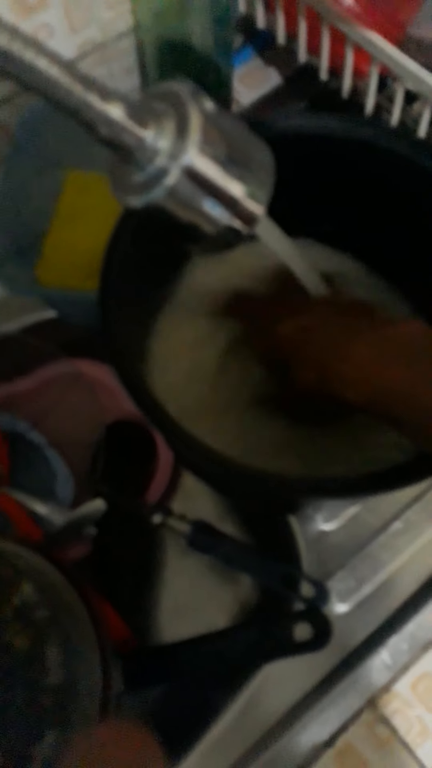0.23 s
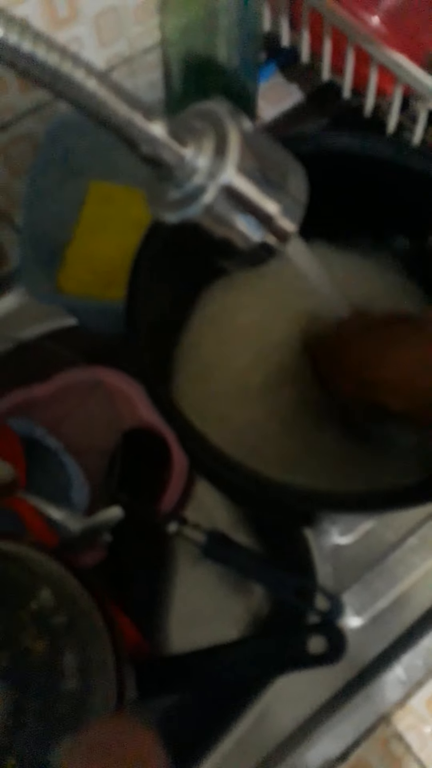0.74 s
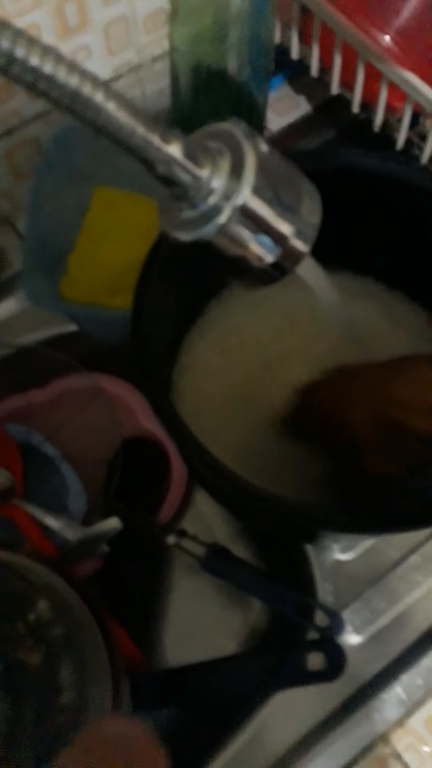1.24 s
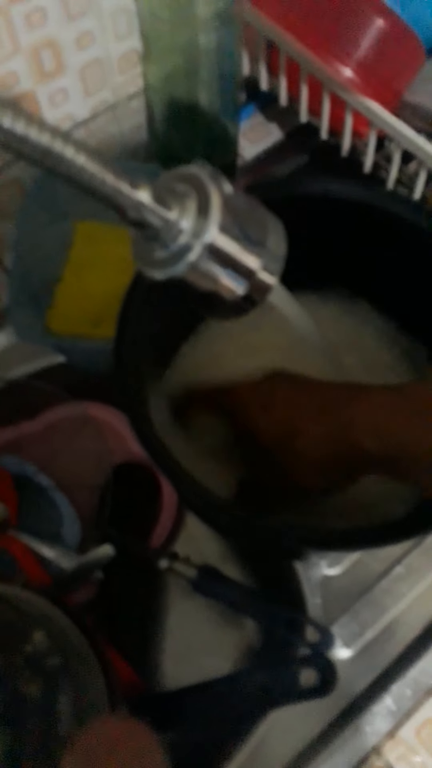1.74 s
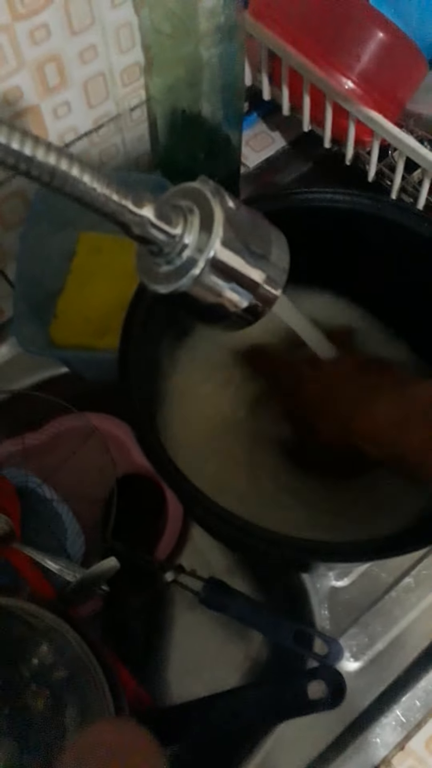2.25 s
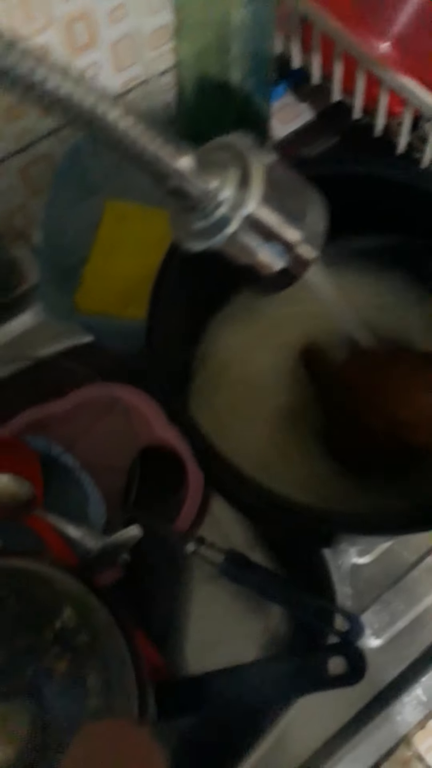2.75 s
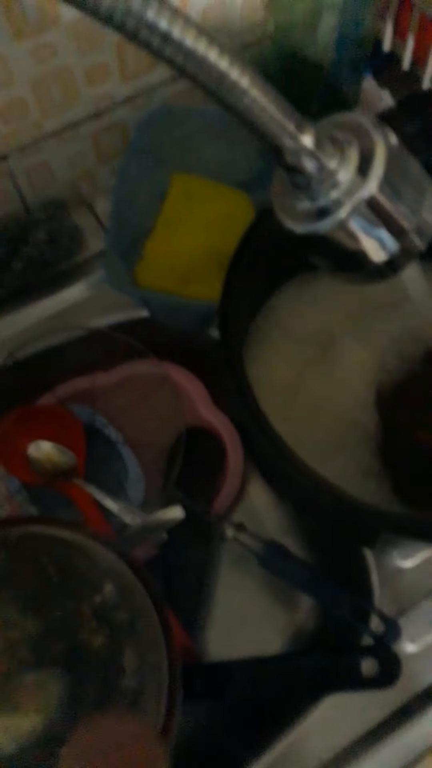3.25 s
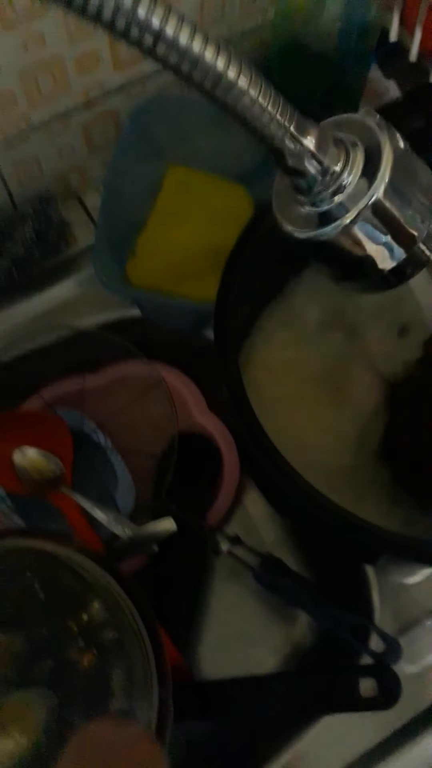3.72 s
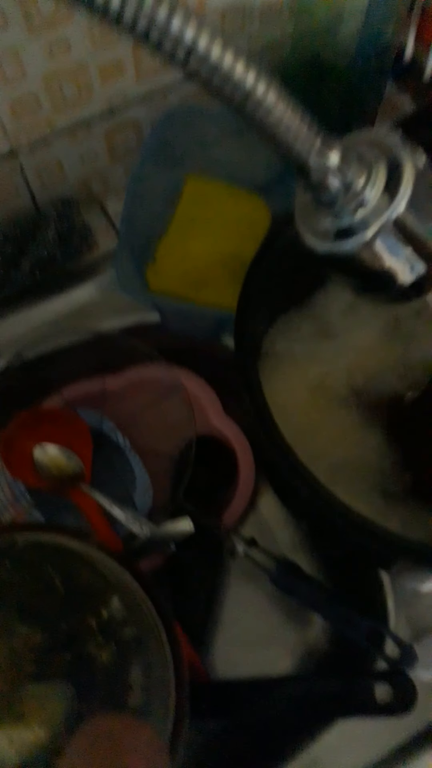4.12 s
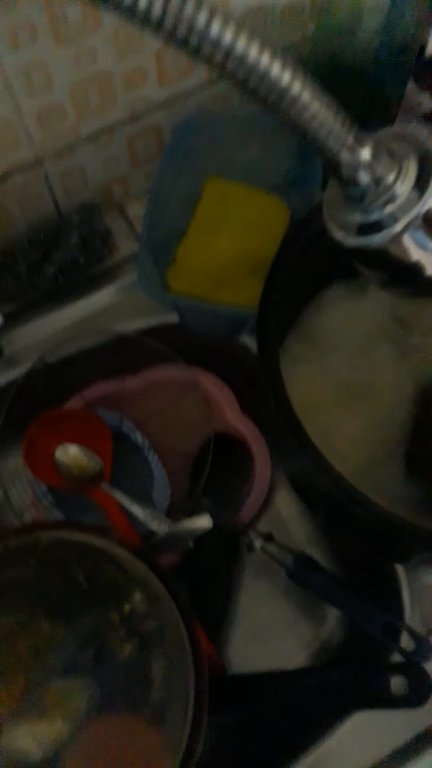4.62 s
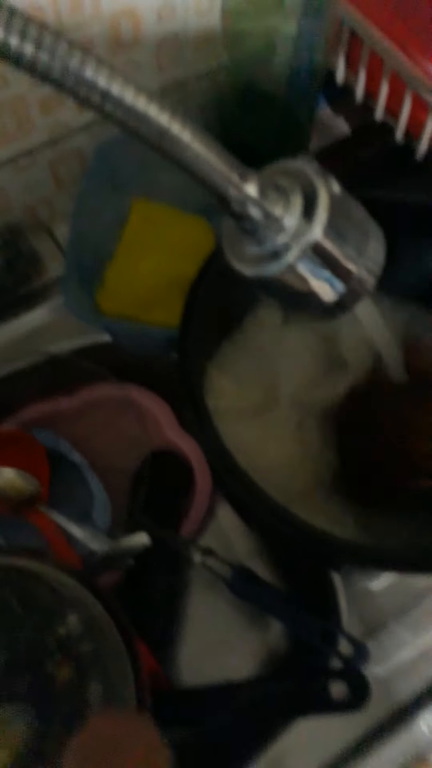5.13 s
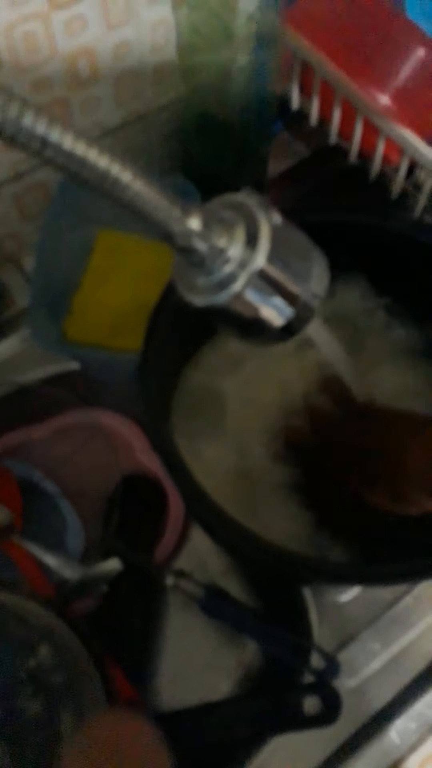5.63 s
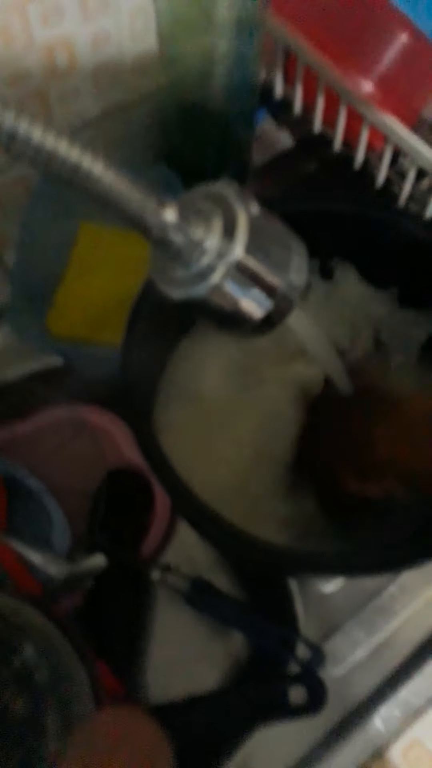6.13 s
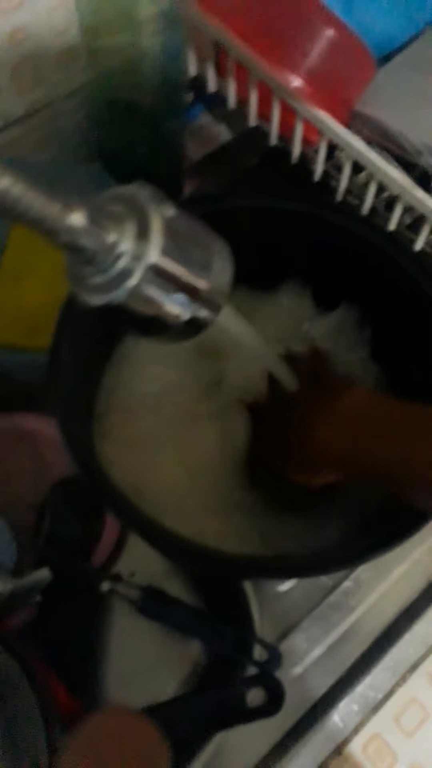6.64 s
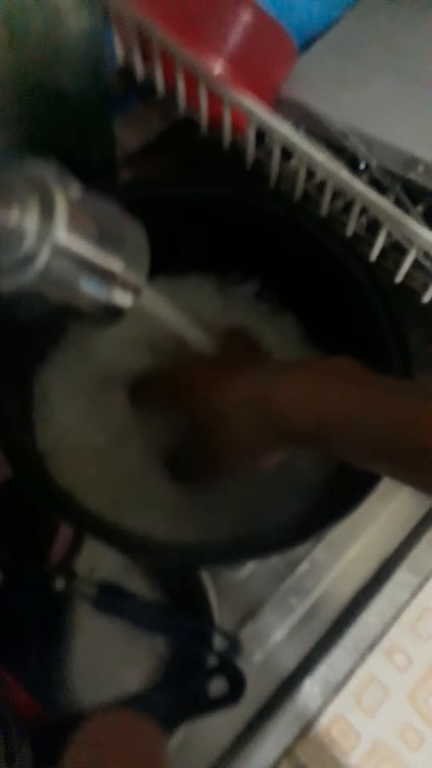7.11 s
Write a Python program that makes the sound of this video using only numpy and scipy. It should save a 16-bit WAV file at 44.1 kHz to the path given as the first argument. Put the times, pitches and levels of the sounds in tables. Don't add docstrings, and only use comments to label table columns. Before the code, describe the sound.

A kitchen tap jet fizzes continuously into a metal pot of rice, close up. A hand stirs slowly at first, each sweep splashing, popping bubbles and dragging grains over the pot with a dull ring. Past the middle it turns to brisk, regular scrubbing, brighter and busier, with rim taps and knocks, then eases as the hand lifts. Small tiled kitchen, short basin echo, one close microphone, identical in both channels.

```python
import sys
import numpy as np
from scipy import signal
from scipy.fft import rfft, irfft, next_fast_len
from scipy.io import wavfile
from scipy.ndimage import uniform_filter1d

SR = 44100
rng = np.random.default_rng(int(sys.argv[2]) if len(sys.argv) > 2 else 0)


def boost_factor(decibels):
    exponent = np.asarray(decibels, float) / 20
    return 10 ** exponent


def unload_wav(signal):
    wavfile.write(
        sys.argv[1],
        SR,
        np.round(np.clip(np.atleast_2d(signal).T, -1, 1) * 32767).astype(np.int16),
    )


N = 324991

# pitch in Hz, level in dB per Hz.
FIZZ = [(880, -2.5), (1500, -11.5), (1800, -3.5), (1940, -2), (2470, 0.5), (4770, 1), (6160, -2.5),
        (7210, -2.5), (7950, -7), (8690, -4.5), (9680, -12.5), (11500, -8.5), (15000, -16), (15750, -16)]


def fizz():
    grains = np.zeros(N)
    for hz in np.geomspace(2000, 9000, num=48):
        grains += signal.oaconvolve(clicks(55, 4.4), bubble(hz, 45 / hz, 0.18))[:N]
    grains = evened(colour(grains, lambda f: np.clip(f / 3000, .3, 3) ** 0.2))

    _, t, z = signal.stft(rng.standard_normal(N), SR, nperseg=256)
    patches = uniform_filter1d(rng.standard_normal(z.shape), size=2, axis=0)
    patches = evened(uniform_filter1d(patches, size=14, axis=1))
    flicker = evened(uniform_filter1d(rng.standard_normal(len(t)), size=3))
    spray = signal.istft(z * boost_factor(1.1 * patches + 0.94 * flicker), SR, nperseg=256)[1][:N]

    water = 0.32 * grains + evened(spray)
    water = evened(colour(water, lambda f: boost_factor(read(FIZZ, f)) / (1 + (1300 / (f + 1)) ** 6)))
    return water + boost_factor(-12.5) * sink(water)


# time in seconds, fine spray level in dB.
FLOW = [(0, -34.5), (.5, -33.5), (1.4, -34), (2.45, -35.5), (3.0, -33.5), (3.3, -33.5), (3.6, -30.5),
        (4.5, -29), (5.5, -30.5), (6.5, -30), (6.9, -29.5), (7.05, -31.5), (7.2, -35.5), (7.28, -37),
        (7.37, -31.5)]
# middle in seconds, length in seconds, splash level in dB.
STIR_SPLASHES = [(0.1, 0.14, -26.5), (0.36, 0.18, -30.5), (0.554, 0.075, -26), (0.94, 0.12, -26),
                 (1.123, 0.07, -28), (1.41, 0.19, -24), (1.724, 0.073, -27), (1.847, 0.18, -28.5),
                 (2.157, 0.14, -26), (2.575, 0.3, -29), (2.91, 0.04, -27.5), (3.08, 0.17, -30),
                 (3.3, 0.022, -26.5), (3.492, 0.075, -29.5)]
# middle in seconds, length in seconds, splash level in dB.
SCRUB_SPLASHES = [(3.66, 0.062, -26), (3.84, 0.13, -29), (4.01, 0.11, -29), (4.19, 0.13, -35),
                  (4.39, 0.11, -29.5), (4.57, 0.05, -27.5), (4.75, 0.09, -25.5), (4.93, 0.086, -30),
                  (5.13, 0.074, -26.5), (5.3, 0.11, -29.5), (5.49, 0.099, -31), (5.7, 0.11, -27),
                  (5.88, 0.086, -26.5), (6.05, 0.074, -24), (6.23, 0.087, -26.5), (6.42, 0.08, -25),
                  (6.62, 0.055, -26), (6.81, 0.053, -28), (6.99, 0.049, -27), (7.12, 0.03, -37),
                  (7.18, 0.031, -38)]
# middle in seconds, length in seconds, level in dB.
MISTS = [(0.143, 0.016, -27), (0.478, 0.028, -33), (0.714, .04, -31), (1.118, 0.019, -27),
         (2.874, 0.023, -39), (4.588, 0.024, -34), (6.796, 0.018, -33), (6.41, .02, -33)]


def jet():
    water = fizz()
    flow_db = curves(FLOW)[0]
    splashes = np.array(STIR_SPLASHES + SCRUB_SPLASHES)
    body_db = swells(splashes + [0, 0, -1.5], -29.5 + 0.58 * (flow_db + 31.5))
    spray_db = swells(np.vstack([splashes + [0, 0, -10], MISTS]), flow_db)

    body = colour(water, lambda f: 1 / (1 + (f / 7000) ** 8))
    spray = evened(water - body)
    hiss = colour(spray, lambda f: 1 / (1 + (10100 / (f + 1)) ** 8))
    nozzle = boost_factor((0.63 - 1) * (flow_db + 30.5))
    return boost_factor(body_db) * evened(body) + boost_factor(spray_db) * (spray - hiss + nozzle * hiss)


# middle in seconds, length in seconds, force in dB, height from 0 (base) to 1 (rim).
STIRS = [(0.125, 0.2, -46.5, 0.3), (0.328, 0.032, -52, 0.1), (0.48, 0.035, -40.5, 0.6),
         (0.582, 0.1, -41.5, 0.65), (0.658, 0.15, -48.5, 0.1), (0.93, 0.074, -42, 0.57),
         (1.042, 0.11, -42.5, 0.45), (1.327, 0.05, -37, 0.56), (1.423, 0.045, -35, 0.56),
         (1.551, 0.032, -36, 0.28), (1.72, 0.037, -42, 0.56), (1.822, 0.071, -38.5, 0.38),
         (1.973, 0.048, -47, -0.05), (2.237, 0.07, -37, 0.6), (2.373, 0.04, -45, 0.071),
         (2.63, 0.13, -40.5, 0.4), (3.006, 0.15, -44, 0.66), (3.06, 0.039, -34.5, 0.51),
         (3.157, 0.069, -41.5, 0.65), (3.323, 0.098, -41.5, 0.57), (3.494, 0.078, -44.5, 0.52)]
# middle in seconds, length in seconds, force in dB, height from 0 to 1.
SCRUBS = [(3.67, 0.064, -37, 0.7), (3.85, 0.069, -36.5, 0.6), (4.0, 0.077, -39, 0.68),
          (4.2, 0.096, -38.5, 0.72), (4.37, 0.065, -34.5, 0.72), (4.56, 0.066, -35, 0.6),
          (4.74, 0.11, -35.5, 0.73), (4.94, 0.062, -35, 0.62), (5.12, 0.11, -34.5, 0.62),
          (5.3, 0.14, -38, 0.68), (5.52, 0.12, -38, 0.78), (5.7, 0.077, -36, 0.81),
          (5.87, 0.069, -36, 0.61), (6.07, 0.084, -34, 0.72), (6.25, 0.072, -32, 0.69),
          (6.45, 0.085, -37.5, 0.64), (6.61, 0.059, -35, 0.79), (6.81, 0.079, -37, 0.65),
          (7.0, 0.066, -36, 0.63), (7.16, 0.14, -40, 0.65)]
# height from 0 to 1, loudness in dB, level of settling rice in dB.
PARTS = [
    (0, 3, -55),
    (.5, -1, -57.5),
    (1, 6, -43.5),
]


def drag():
    s, length, force_db, height = np.transpose(STIRS + SCRUBS)
    settle_db = 0.098 * (curves(FLOW)[0] + 33)
    lift_db = -3.5 * np.clip((np.arange(N) / SR - 7.23) / 0.015, 0, 1)
    parts_db = []
    for part, db, rest_db in PARTS:
        reach_db = 28 * (height - part) ** 2
        strokes = np.transpose([s, length, force_db + db - reach_db])
        parts_db.append(swells(strokes, rest_db + settle_db, skew=0.36) + lift_db)
    return parts_db


# pitch in Hz, width in Hz, level in dB.
BASE = [(234.6, 20, -5), (287, 37, -1.5), (356, 25, -3), (461.4, 28, 0)]
# pitch in Hz, width in Hz, level in dB.
WALL = [(580, 61, 2.5), (550, 50, -9), (789, 28, 0), (664, 48, -9.5)]
# pitch in Hz, width in Hz, level in dB.
RIM = [(1050, 230, 2), (1110, 45, 3), (1190, 62, -11.5), (1415, 240, 1.5), (1574, 280, 3.5)]
WANDER = [0.015, 0.02, 0.037]


def rice(drag_db):
    out = np.zeros(N)
    shared = evened(clicks(250, 4.8))
    for modes, db, wander in zip((BASE, WALL, RIM), drag_db, WANDER):
        drift = wander * lumps(samples=900)
        ticks = 1.05 * shared + evened(clicks(300, 2.0)) + 0.99 * rng.standard_normal(N)
        ring = np.zeros(N)
        for k, (hz, width, level_db) in enumerate(modes):
            mode = wandering(ticks, hz, width, drift) / np.sqrt(width)
            ring += (-1) ** k * boost_factor(level_db) * mode
        out += boost_factor(db - 3.0) * evened(ring * boost_factor(2.1 * lumps(samples=1100)))
    return out


# time in seconds, force in dB.
SWEEP = [
    (1.24, -99),
    (1.28, -49),
    (1.31, -33),
    (1.36, -33),
    (1.41, -24.5),
    (1.46, -34),
    (1.51, -45),
    (1.56, -99),
]
# pitch in Hz, width in Hz, level in dB.
SWEPT = [
    (352, 38, -7),
    (5500, 3100, 4.5),
    (487, 200, -9.5),
]


def sweep():
    ticks = evened(clicks(1300, 2.6)) + rng.standard_normal(N)
    ring = np.zeros(N)
    for hz, width, db in SWEPT[1:]:
        ring += boost_factor(db) * evened(resonate(resonate(ticks, hz, width), hz, width))
    hz, width, db = SWEPT[0]
    force_db = curves(SWEEP)[0]
    pitch = hz * (1 + 0.03 * lumps(samples=700))
    held = np.sqrt(2) * np.sin(2 * np.pi * np.cumsum(pitch) / SR)
    held += 0.75 * evened(resonate(resonate(ticks, hz, width), hz, width))
    return boost_factor(np.minimum(force_db, -31)) * ring + boost_factor(force_db + db) * held


# start in seconds, peak in dB, pitch in Hz.
SNAPS = [(.1328, -4, 5000), (.315, -8, 3420), (.5086, -12, 2920), (1.298, -8, 4100), (2.515, -6, 2530),
         (2.5626, -5.5, 4300), (2.7242, -10.5, 2560), (3.041, -12, 2870), (3.0909, -13, 3460),
         (3.1572, -6, 3860), (3.2868, -16, 2540), (3.4975, -5, 4000), (3.6235, -6, 4600),
         (4.0243, -8, 2760), (4.2266, -8.5, 4700), (4.397, -10, 2900), (4.6223, -9, 5250),
         (4.921, -3.5, 2950), (5.077, -13, 2530), (5.2864, -3.5, 5300), (5.5268, -7.5, 2870),
         (6.0831, -9, 3260), (6.384, -17, 3230), (6.4042, 1, 3050), (6.7848, -3.5, 3130),
         (6.8217, -9, 3170), (6.9876, -12, 3220), (3.006, -11, 1540), (2.876, -6.5, 7100), (.38, -11, 2450),
         (6.187, -1, 4040), (5.4843, -13, 3480), (2.86, -16, 2410), (1.6875, -11, 2200), (5.126, -16, 1520),
         (6.2515, -11, 2500)]
# start in seconds, peak in dB, pitch in Hz.
PLOPS = [(.1067, -8, 3600), (.5675, -3, 2540), (1.0987, -11, 2250), (1.6848, -13, 3540), (2.189, -8, 2530),
         (2.2907, -10.5, 2500), (2.826, -13, 2350), (2.8604, -6, 2030), (2.9299, -7.5, 2520),
         (3.6736, -4, 4740), (3.8475, -3, 3170), (4.3565, -10, 1950), (4.5236, -3.5, 4800),
         (4.551, -4, 3300), (4.5657, -0.5, 2300), (4.7296, -6.5, 3140), (5.1228, -11, 2060),
         (5.4403, -4, 5400), (5.4845, -3.5, 3130), (5.6989, -6.5, 2180), (5.7254, -8, 3730),
         (6.134, -12.5, 2360), (3.8575, -17, 3180), (1.718, -12, 2500), (5.1305, -7, 2120),
         (6.7912, -4, 6200), (6.7855, -5, 8300), (6.415, -12, 1850), (3.008, -23, 1250), (6.2512, -3, 3180),
         (6.4295, -9, 2800), (6.606, -9.5, 2150), (6.632, -11, 4000), (6.762, -10, 2980)]
# start in seconds, peak in dB,
# pitch in Hz.
DROPS = [(0.071, -11, 3380), (0.488, -18, 1920), (0.567, -18, 3320), (0.568, -23, 3880),
         (1.165, -12.5, 3360), (1.308, -17, 4070), (1.311, -13, 3620), (1.366, -14, 5730),
         (1.371, -11, 3830), (1.404, -13, 4670), (1.418, -13, 5380), (1.684, -11, 2930), (1.686, -10, 3660),
         (1.918, -17, 2240), (2.145, -13, 4950), (2.481, -14, 2820), (2.573, -22, 1790),
         (3.537, -12.5, 2650), (4.026, -17, 2730), (4.227, -17, 2030), (4.397, -17, 2690), (4.4, -14, 4160),
         (4.581, -10, 3400), (4.588, -12, 2730), (4.758, -15, 1860), (4.773, -9, 4910), (4.923, -15, 4610),
         (5.1, -14, 2690), (5.142, -14, 5530), (5.153, -12, 3400), (5.162, -16, 2200), (5.287, -19, 5360),
         (5.324, -15, 1930), (5.428, -21, 1900), (5.567, -13, 2450), (5.637, -9.5, 2500),
         (5.725, -10, 4820), (5.726, -12, 2500), (5.868, -13, 4410), (5.896, -10, 4540), (6.196, -20, 2150),
         (6.384, -17, 3140), (6.404, -7, 4320), (6.409, -9, 4870), (6.422, -12, 2240), (6.459, -16, 2780),
         (6.481, -15, 1840), (6.606, -17, 3270), (6.625, -12, 4200), (6.66, -17, 2390), (6.791, -11, 4520),
         (6.821, -23, 2090), (6.837, -4.5, 3100), (6.988, -22, 2000), (7.005, -17, 3230),
         (6.961, -15, 4300), (6.964, -22, 2450), (6.989, -11, 4380), (7.1163, -11, 3880),
         (7.165, -18, 3950), (7.181, -20, 2400), (7.197, -17, 3120), (7.299, -16, 3800), (6.925, -9, 8300),
         (6.95, -5, 6700)]


def bubbles():
    snaps = struck(ringing(SNAPS, 20.5), glide=0.027, crack=0.51, crack_s=0.0017)
    plops = struck(ringing(PLOPS, 22.5), 0.073, 0.2, 0.0035, rise_cycles=1.0)
    drops = struck(ringing(DROPS, 25), 0.075, .08, .002, rise_cycles=1.76)
    return boost_factor(-4.0) * snaps + boost_factor(-0.5) * plops + boost_factor(2.5) * drops


# start in seconds, peak in dB, pitch in Hz.
KNOCKS = [(1.115, -20.5, 1015), (3.005, -25, 1110), (1.523, -26, 1020), (3.814, -20.5, 1050),
          (3.956, -25.5, 1030), (4.046, -29, 810), (4.162, -18.5, 1150), (4.355, -21, 1094),
          (4.503, -25, 1080), (4.898, -21, 1010), (4.939, -27, 1060), (5.038, -24, 1110),
          (5.316, -28, 1110), (5.122, -17.5, 1050), (5.518, -20, 1110), (6.05, -22, 1080),
          (6.195, -29, 1110), (6.212, -20, 1130), (6.472, -20.5, 1050), (6.939, -24.5, 1110),
          (7.013, -21.5, 1026), (6.388, -25, 1110)]
# start in seconds, peak in dB, pitch in Hz.
TAPS = [(0.565, -21, 1620), (3.072, -33, 780), (3.475, -25, 1110), (3.617, -27, 1110), (3.675, -32, 1310),
        (3.878, -28, 1400), (3.965, -20, 1420), (4.227, -17, 1067), (4.329, -29, 1060), (4.52, -20.5, 1050),
        (4.578, -27, 1080), (4.671, -21.5, 1070), (4.73, -20.5, 1100), (4.877, -15.5, 1130),
        (4.953, -24, 1130), (4.957, -25, 1570), (5.099, -31, 1120), (5.228, -33, 1110), (5.25, -24, 1420),
        (5.538, -18, 1070), (5.645, -22, 1130), (5.809, -25, 1620), (5.83, -17, 1100), (5.884, -24, 1110),
        (6.063, -30, 1050), (6.251, -9, 1120), (6.412, -25, 1180), (6.429, -28, 1130), (6.541, -26, 1590),
        (6.966, -22, 1170)]


def knocks():
    hits = struck(ringing(KNOCKS, 33), glide=0.11, crack=0.77, crack_s=0.0056)
    taps = struck(ringing(TAPS, 32.6), 0.046, 0.44, 0.0038, rise_cycles=0.91)
    return boost_factor(1.4) * hits + boost_factor(2.0) * taps


# start in seconds, peak in dB, pitch in Hz, seconds to die by 60 dB.
THUMPS = [(0.319, -31.5, 280, 0.064), (0.72, -30, 297, 0.085), (1.036, -28, 314, 0.068),
          (1.313, -22.5, 343, 0.053), (1.369, -25, 366, 0.05), (1.53, -22.5, 322, 0.029),
          (1.808, -30.5, 304, 0.06), (1.946, -22, 290, 0.025), (2.187, -32.5, 307, 0.074),
          (2.208, -34, 296, 0.3), (2.346, -29, 285, 0.097), (2.609, -22, 312, 0.046),
          (3.028, -28, 287, 0.054), (4.526, -26, 445, 0.02), (4.941, -40, 304, 0.051),
          (5.129, -33, 460, 0.052), (5.328, -24, 275, 0.048), (5.519, -30, 267, 0.053),
          (6.221, -32, 446, 0.068), (6.988, -31, 420, 0.05)]


def thumps():
    higher = [(s, db, hz * 1.5, 0.55 * t60) for s, db, hz, t60 in THUMPS]
    low = struck(THUMPS, glide=-0.034, crack=.1, crack_s=.002, rise_cycles=0.7)
    return boost_factor(2.0) * low + boost_factor(-5.5) * struck(higher, 0.03, .1, .002)


# start in seconds, peak in dB, pitch in Hz.
BLOOPS = [(3.665, -24.5, 573), (4.15, -32, 584), (4.356, -16, 577), (4.575, -25, 597), (5.063, -23, 620),
          (5.68, -31, 570), (5.875, -23, 590), (6.03, -28, 594), (6.262, -21, 576), (6.465, -26, 580),
          (6.598, -24, 615), (6.80, -30, 580), (7.11, -30.5, 584), (7.17, -25, 572), (3.03, -31, 610),
          (4.402, -31, 626), (4.42, -29, 566), (4.695, -31, 604), (4.78, -37, 580), (4.964, -28, 600),
        (5.199, -45, 520), (5.252, -35, 603), (5.28, -39, 590), (5.642, -32, 640), (5.704, -29.5, 580),
        (5.853, -26, 560), (6.112, -43, 586), (6.446, -31, 605), (6.774, -32, 607), (7.204, -38.5, 606)]
# start in seconds, peak in dB, pitch in Hz.
CLUMPS = [(0.47, -34, 765), (0.47, -43, 600), (0.893, -33, 790), (0.905, -31, 1050), (0.962, -33, 784),
          (0.96, -28, 1110), (1.30, -28, 790), (2.185, -37, 790), (2.185, -33, 1090), (2.57, -30, 780),
          (2.57, -32, 604), (2.575, -30, 1110), (2.607, -26, 590), (2.607, -28, 1080), (2.69, -31, 1010),
          (2.965, -31, 790), (3.813, -27, 869), (4.147, -34, 783), (4.322, -29, 700), (4.903, -32, 837),
          (4.938, -27, 774), (5.122, -23, 726), (5.62, -35, 920), (5.787, -33, 789), (5.89, -32, 800),
          (7.012, -27, 654)]


def rice_lumps():
    lower = struck(ringing(BLOOPS, 50), glide=0.065, crack=0.16, crack_s=.002, rise_cycles=1.3)
    upper = struck(ringing(CLUMPS, 47), 0.069, .2, .002, rise_cycles=0.53)
    return lower + boost_factor(-0.2) * upper


# pitch in Hz, seconds to die by 60 dB.
SINK = [(300, 0.14), (2000, 0.088), (8000, 0.039)]


def sink(x):
    taps = np.zeros(SR // 4)
    at = np.arange(60, len(taps) - 20, 20)
    taps[at + rng.integers(0, 20, len(at))] = rng.choice([-1., 1.], len(at))
    hz, t, z = signal.stft(taps, SR, nperseg=128)
    tail = signal.istft(z * boost_factor(-60 * t / read(SINK, hz)[:, None]), SR, nperseg=128)[1]
    return signal.fftconvolve(x, tail / np.linalg.norm(tail))[:N]


# pitch in Hz, level in dB per Hz.
AIR = [(15, -43), (25, -25), (48, -23), (145, -3.5), (191, -1), (398, -9), (575, -28), (703, -5),
       (1010, 8.5), (1340, -46), (2000, -33), (2600, -39), (4400, -120)]
# pitch in Hz, rms level in dB.
HUM = (146.8, -57.5)
# pitch in Hz, width in Hz, level in dB.
BASIN = [(70, 9, -66), (97, 12, -64.5)]


def kitchen(base_db):
    air = evened(colour(rng.standard_normal(N), lambda f: boost_factor(read(AIR, f))))
    hum_hz, hum_db = HUM
    pump = np.sin(2 * np.pi * hum_hz * np.arange(N) / SR)
    pump += 2.5 * resonate(rng.standard_normal(N), hum_hz, 6.5)
    out = boost_factor(-56) * air + boost_factor(hum_db) * evened(pump)
    push = boost_factor(0.43 * base_db) * rng.standard_normal(N)
    for hz, width, db in BASIN:
        out += boost_factor(db) * evened(resonate(resonate(push, hz, width), hz, 2 * width))
    return out


def bubble(hz, t60, glide, rise_cycles=0.24):
    t = np.arange(int(t60 * SR) + 8) / SR
    rise = 1 - np.exp(-t * hz / rise_cycles)
    return np.sin(2 * np.pi * hz * (t + glide * t ** 2 / (2 * t60))) * boost_factor(-60 * t / t60) * rise


def struck(events, glide, crack, crack_s, rise_cycles=0.38):
    out = np.zeros(N + SR)
    t = np.arange(400) / SR
    splinters = rng.standard_normal((len(events), len(t))) * np.exp(-t / crack_s)
    band = signal.butter(2, [1400, 6000], "band", fs=SR, output="sos")
    cracks = signal.sosfilt(band, splinters)
    for (s, db, hz, t60), noise in zip(events, cracks):
        start = round(s * SR)
        ring = bubble(hz, np.clip(t60, .003, .3), glide, rise_cycles)
        out[start:start + len(ring)] += boost_factor(db) * ring
        out[start:start + len(t)] += boost_factor(db) * crack * noise / abs(noise).max()
    return out[:N]


def ringing(rows, cycles):
    return [(s, db, hz, cycles / hz) for s, db, hz in rows]


def clicks(per_s, spread_db):
    place, size, sign = rng.random((int(per_s * N / SR), 3)).T
    sizes = boost_factor(spread_db * np.minimum(-np.log(size), 3.8)) * np.sign(sign - .5)
    return np.bincount((place * N).astype(int), sizes, N)


def lumps(samples):
    smooth = uniform_filter1d(rng.standard_normal(N), size=samples)
    return evened(uniform_filter1d(smooth, size=samples))


def swells(rows, rest_db, skew=0):
    s, length, db = np.transpose(rows)
    t = np.arange(0, N / SR + .01, .004)
    late = t[:, None] - s + skew * length / 2
    side = length / 2 * (1 + skew * np.sign(late))
    power = (boost_factor(2 * db) * np.exp(-.5 * (late / side) ** 2)).sum(axis=1)
    return 10 * np.log10(np.interp(np.arange(N) / SR, t, power) + boost_factor(2 * rest_db))


def resonate(x, hz, width):
    r = np.exp(-np.pi * width / SR)
    return 2 * signal.lfilter([1 - r], [1, -r * np.exp(2j * np.pi * hz / SR)], x).real


def wandering(x, hz, width, drift):
    turn = np.exp(2j * np.pi * np.cumsum(hz * (1 + drift)) / SR)
    y = x / turn
    for r in np.exp(-np.pi * width * np.array([1, 3]) / SR):
        y = signal.lfilter([1 - r], [1, -r], y)
    return 2 * (turn * y).real


def evened(x):
    return x / np.sqrt(np.mean(x ** 2) + 1e-20)


def read(points, hz):
    f, value = np.transpose(points)
    return np.interp(np.log(hz + 1), np.log(f + 1), value)


def curves(rows):
    s, *columns = np.transpose(rows)
    return [np.interp(np.arange(N) / SR, s, c) for c in columns]


def colour(x, gain):
    size = next_fast_len(N)
    return irfft(rfft(x, size) * gain(np.fft.rfftfreq(size, 1 / SR)), size)[:N]


def scene():
    water = bubbles()
    pot = knocks() + thumps() + rice_lumps()
    drag_db = drag()
    mix = jet() + rice(drag_db) + sweep() + water + pot
    mix += sink(boost_factor(-4.0) * water + boost_factor(-9) * pot)
    mix += kitchen(drag_db[0])
    return np.array([mix, mix])


def roll_off(x):
    return signal.sosfilt(signal.butter(12, 17010, fs=SR, output="sos"), x)


def record(dry):
    mono = colour(dry[0], lambda f: (f < 15775) / (1 + (41 / (f + 1)) ** 4))
    return roll_off(np.array([mono, mono]))


dry = scene()
out = record(dry)
unload_wav(out)
```